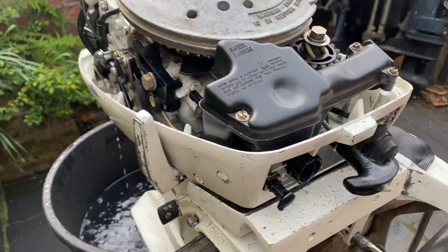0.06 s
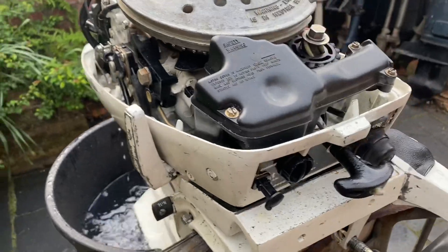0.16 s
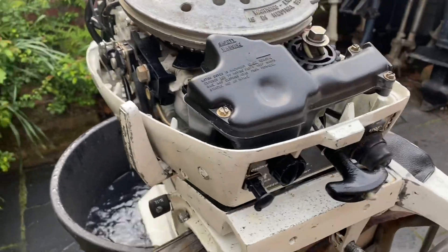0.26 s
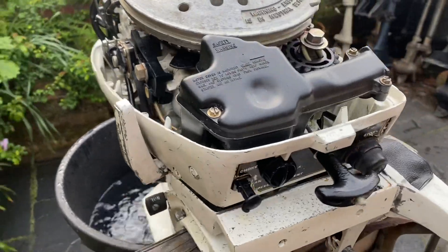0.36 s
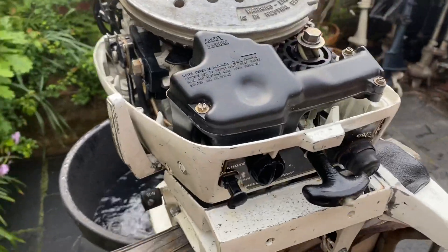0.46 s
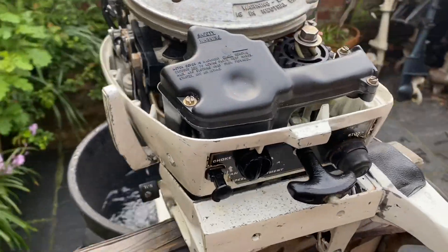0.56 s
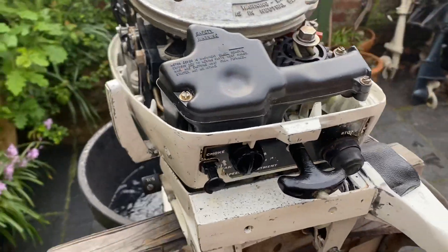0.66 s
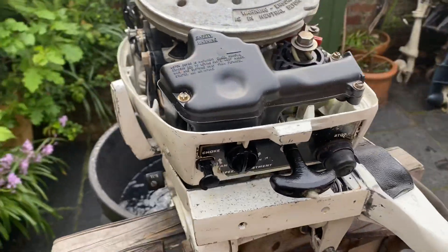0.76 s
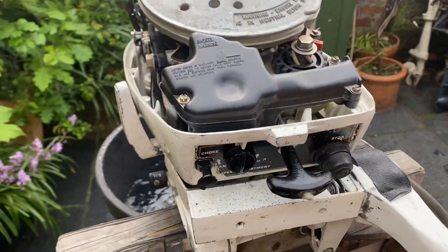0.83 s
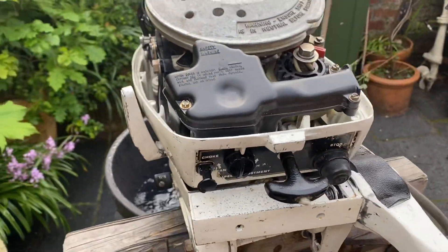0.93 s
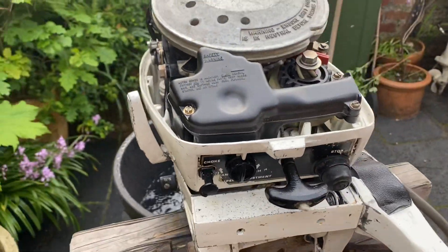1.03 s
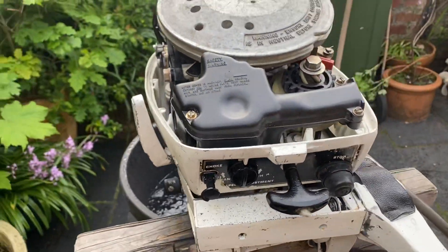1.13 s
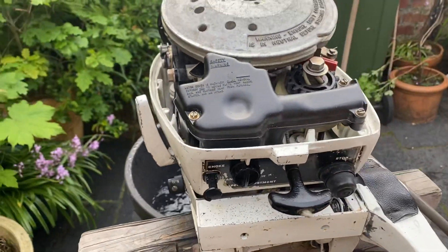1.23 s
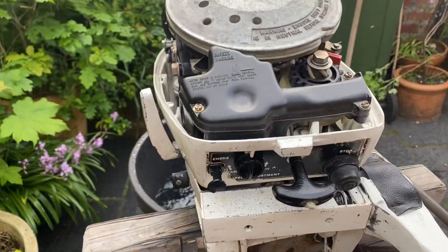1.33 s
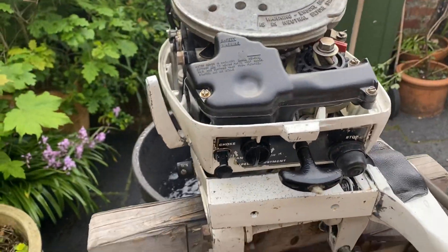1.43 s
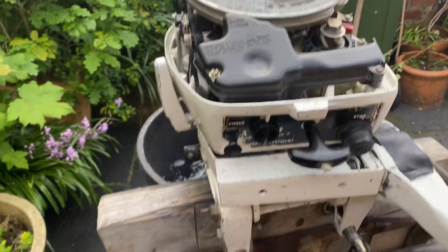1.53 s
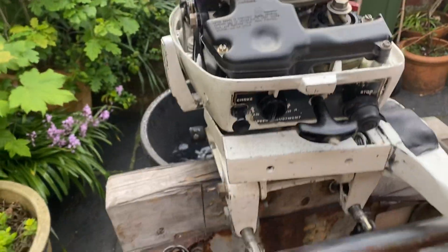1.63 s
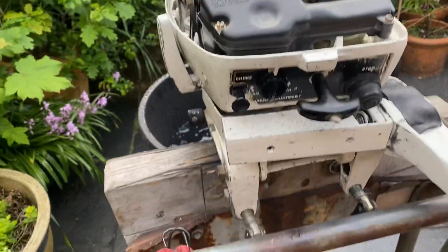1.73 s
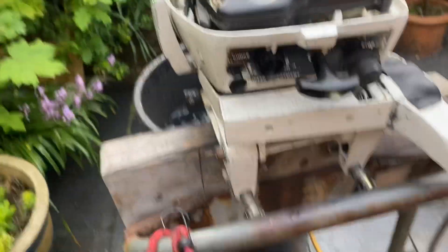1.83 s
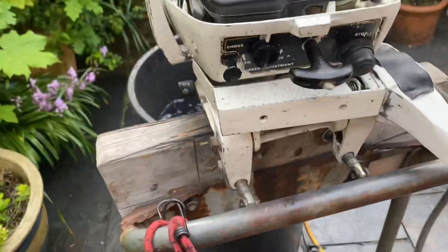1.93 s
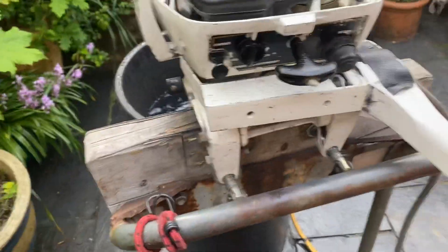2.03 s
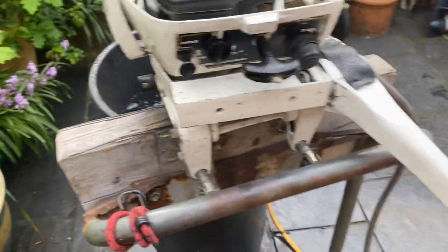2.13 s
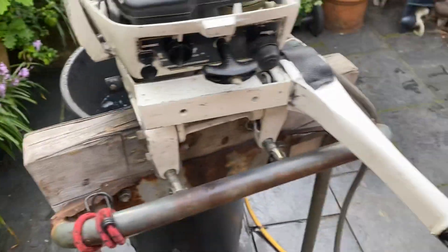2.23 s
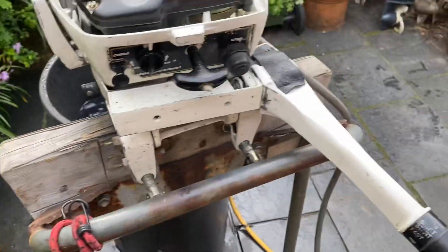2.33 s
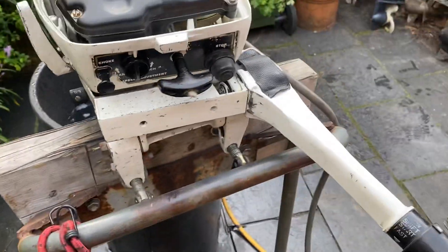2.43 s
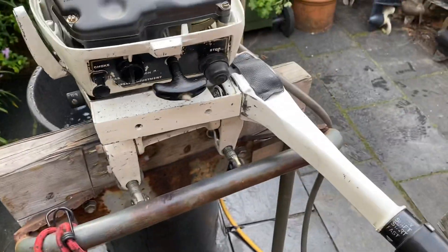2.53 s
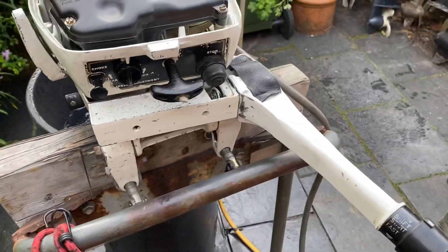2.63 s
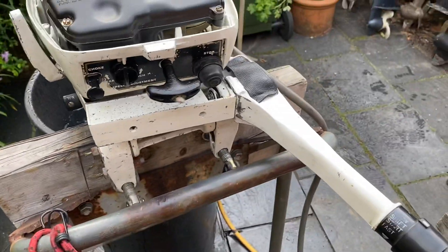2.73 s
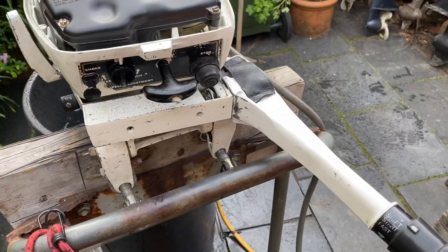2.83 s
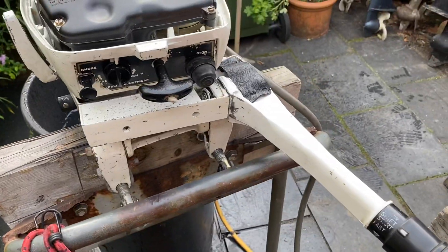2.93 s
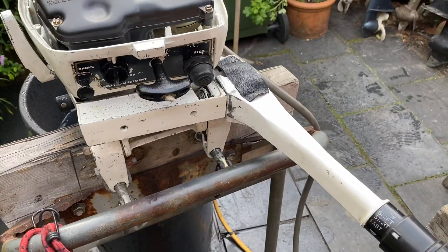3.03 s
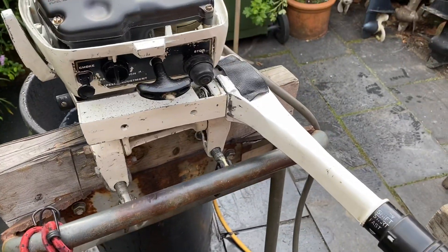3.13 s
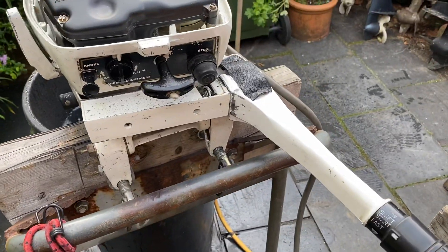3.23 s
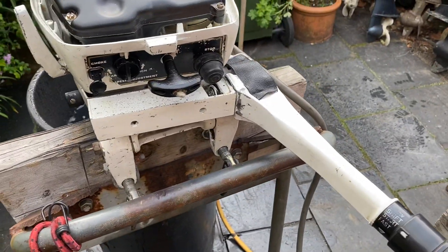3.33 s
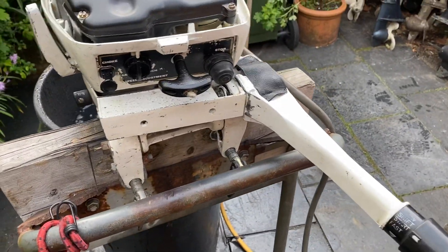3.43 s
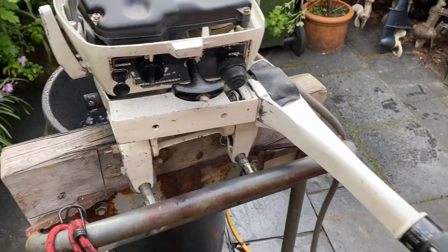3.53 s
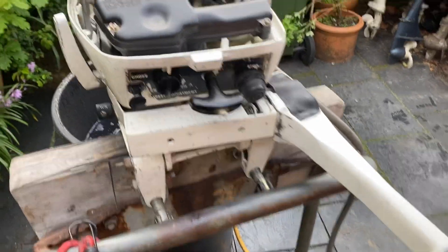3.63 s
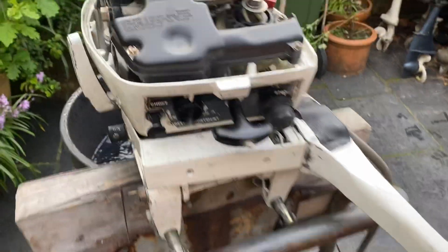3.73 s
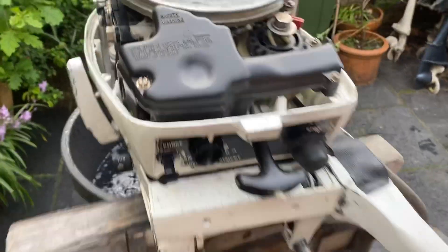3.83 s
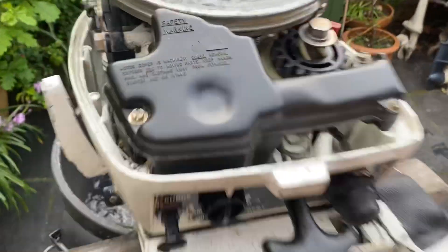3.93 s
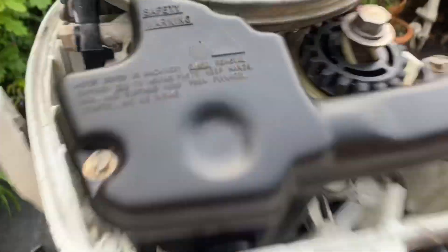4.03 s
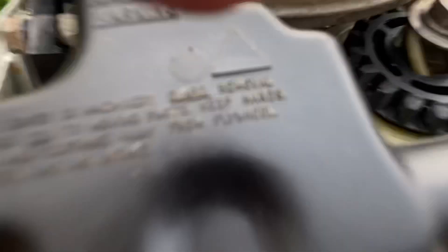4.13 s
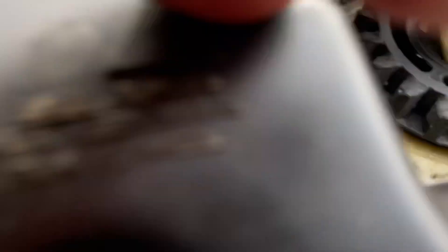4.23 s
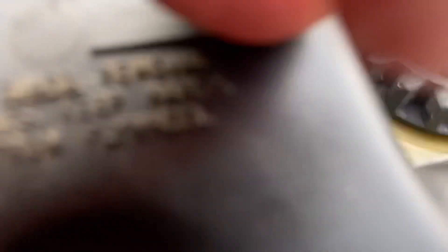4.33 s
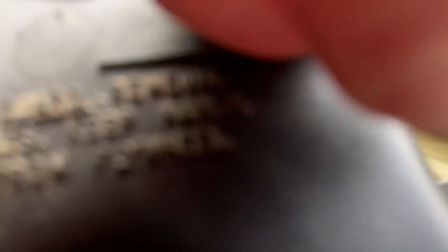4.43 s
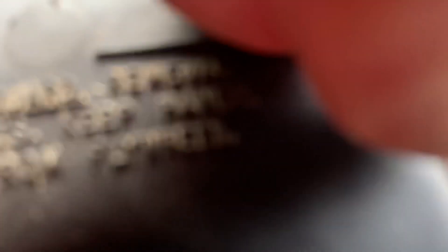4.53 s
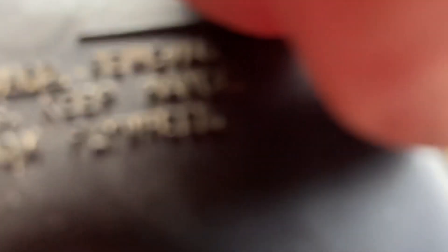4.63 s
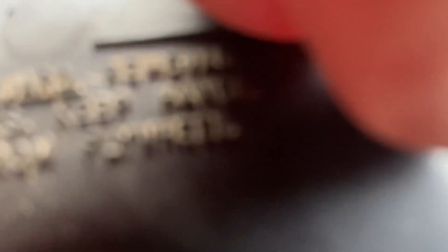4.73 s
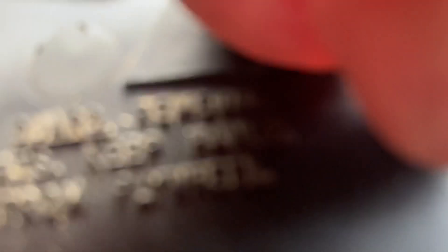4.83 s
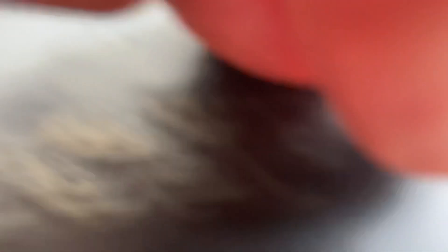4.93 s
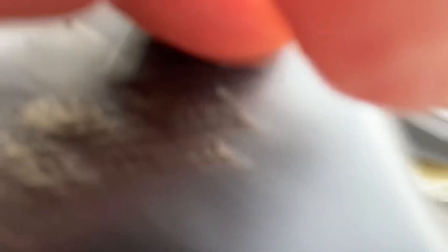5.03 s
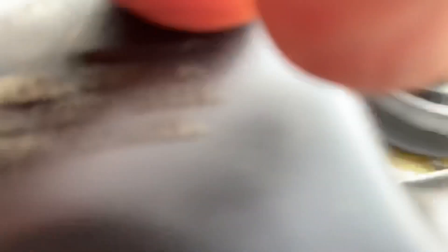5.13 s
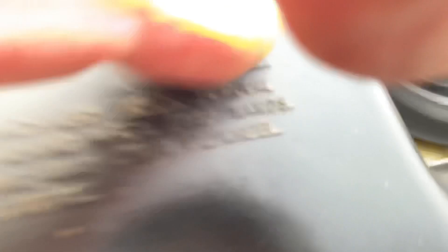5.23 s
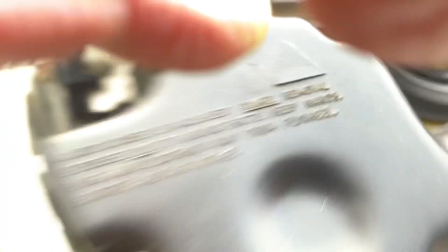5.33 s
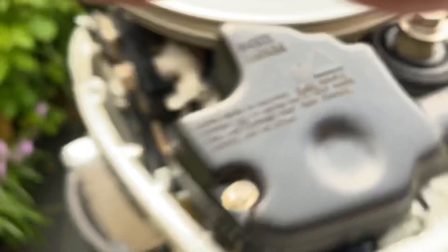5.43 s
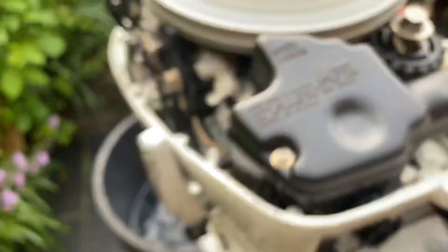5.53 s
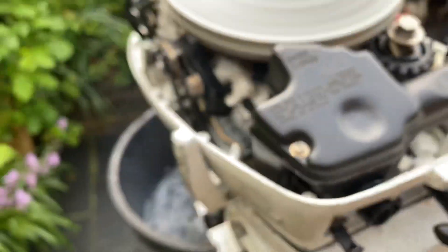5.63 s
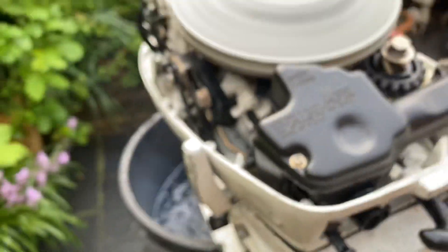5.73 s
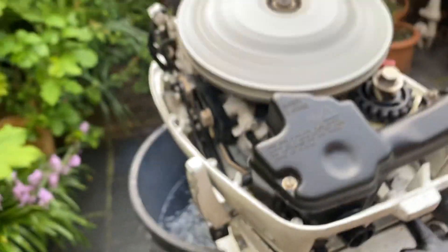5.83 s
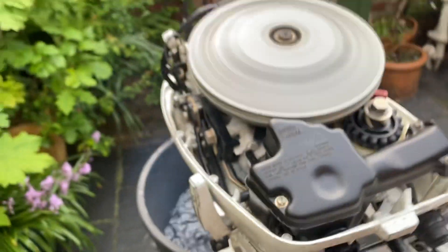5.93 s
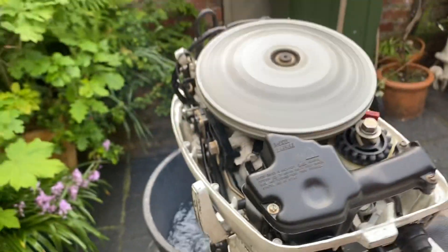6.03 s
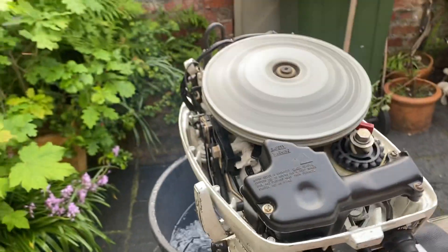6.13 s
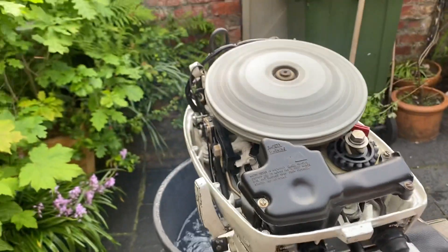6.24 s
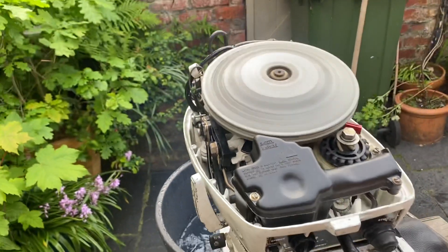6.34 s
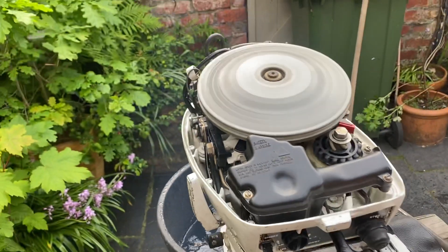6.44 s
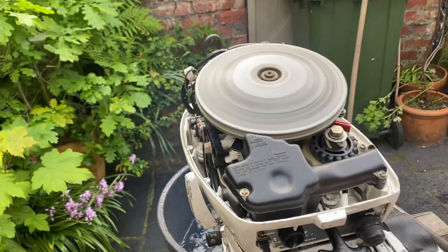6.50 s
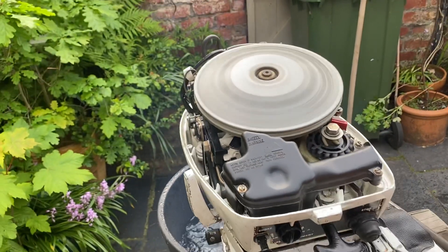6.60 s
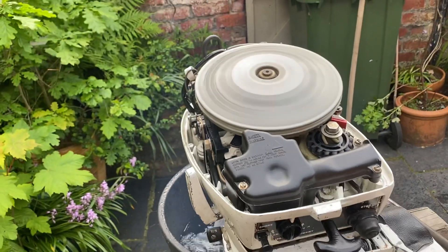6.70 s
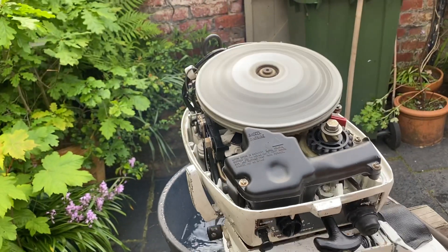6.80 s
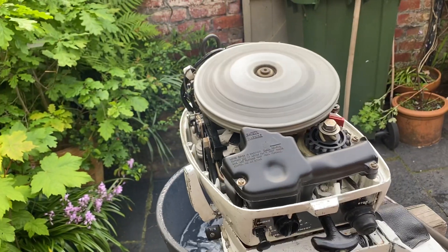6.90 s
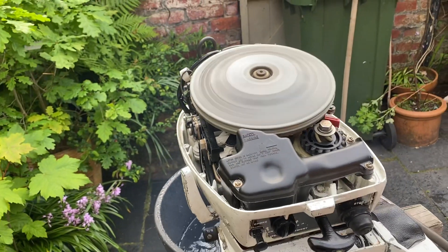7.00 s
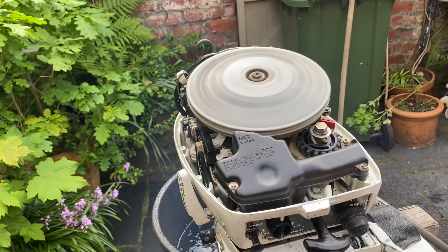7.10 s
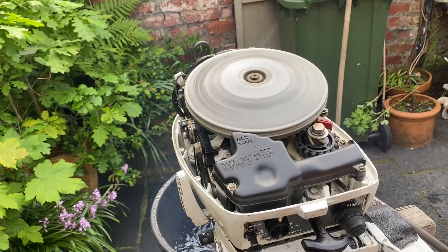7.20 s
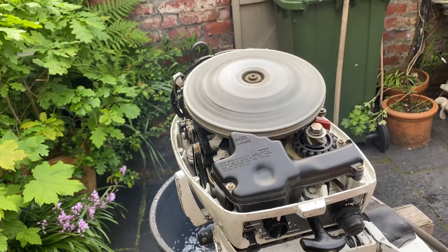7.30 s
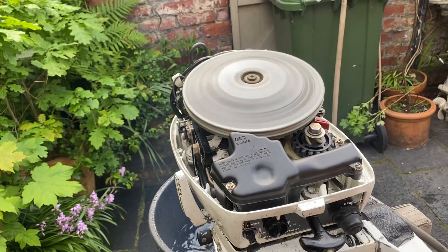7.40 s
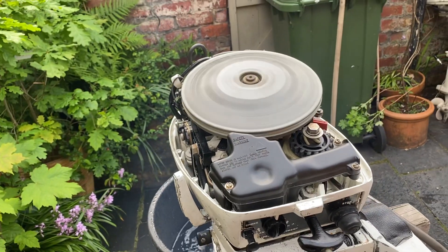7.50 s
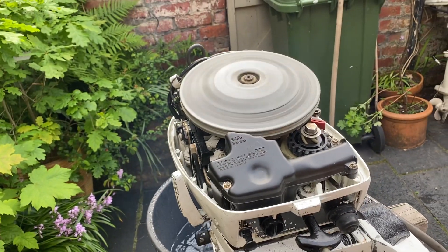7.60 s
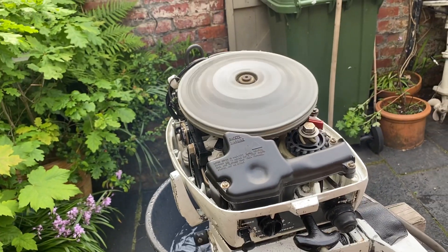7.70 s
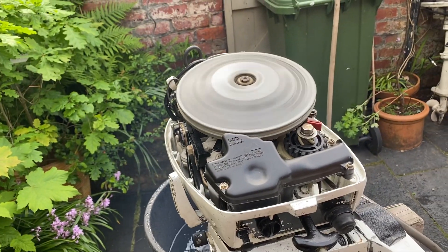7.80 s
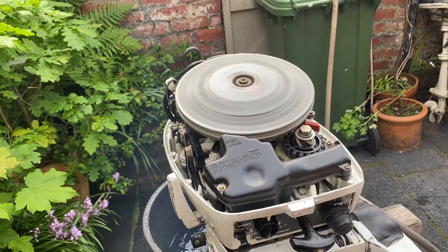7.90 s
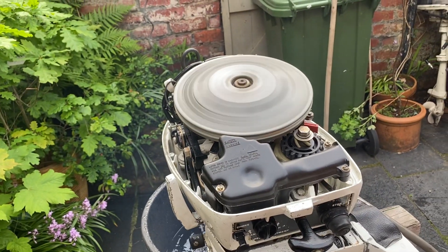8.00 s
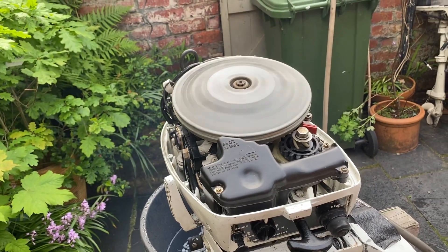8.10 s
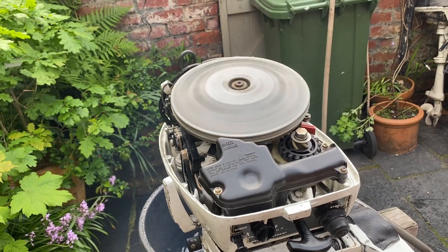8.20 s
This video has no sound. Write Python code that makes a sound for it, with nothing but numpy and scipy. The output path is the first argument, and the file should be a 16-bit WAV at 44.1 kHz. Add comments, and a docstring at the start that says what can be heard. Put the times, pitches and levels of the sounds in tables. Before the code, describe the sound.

A hose trickles into a bin of water in a small walled yard, over faint splashing hiss and hum. Soft drips, knocks and hand bumps come close to the phone. Fingers tap a plastic cover, a starter grinds in a short harsh burst, and a small two-stroke outboard catches, revs up fast, then drops toward a lumpy, slower run.

```python
"""Two-stroke outboard in a bin of water.

A small twin in a walled yard, heard by a phone: hand bumps and drips, fingers tap the cover, the starter
grinds, the engine catches, races and slows. Firing pulses ring the drowned exhaust leg and the air box;
throbbing noise makes clatter and hiss. A hose trickles in as gliding bubble tones over a noisy yard."""
import sys
import numpy as np
from scipy import signal
from scipy.fft import rfft, irfft, next_fast_len
from scipy.io import wavfile
from scipy.ndimage import uniform_filter1d

SR = 44100
rng = np.random.default_rng(int(sys.argv[2]) if len(sys.argv) > 2 else 0)


def bounce(signal):
    """Save signal as a 16-bit WAV file at the path given by the first command-line argument."""
    frames = np.transpose(np.atleast_2d(signal))
    limited = np.clip(frames, -1, 1)
    pcm = np.round(limited * 32767).astype(np.int16)
    wavfile.write(sys.argv[1], SR, pcm)


N = 364266


def undb(db):
    """Amplitude factor for a level in dB."""
    return 10 ** (np.asarray(db) / 20)


def level(x, db):
    """Scale to an rms in dB."""
    return x * undb(db) / np.sqrt(np.mean(x ** 2))


def ramp(start, length):
    """0 before start, 1 after start + length, in seconds."""
    return np.clip((np.arange(N) / SR - start) / length, 0, 1)


def curves(table):
    """Columns on every sample, and a gate that is open while the table lasts."""
    s, *columns = np.transpose(table)
    t = np.arange(N) / SR
    gate = np.clip(np.minimum(t - s[0], s[-1] + 0.032 - t) / 0.022, 0, 1)
    return [np.interp(t, s, c) for c in columns] + [gate]


def pan(x, db):
    """Two channels, the left louder than the right by db."""
    return x * undb(np.array([db / 2, -db / 2]).reshape(2, -1))


def peak(x, hz, q):
    """One resonance."""
    return signal.lfilter(*signal.iirpeak(hz, q, SR), x)


def band(x, order, edges_hz, kind="band"):
    """Butterworth filter."""
    return signal.sosfilt(signal.butter(order, edges_hz, kind, fs=SR, output="sos"), x)


def modes(x, table):
    """Resonances side by side, alternating in sign; rms 1."""
    out = 0
    for k, (hz, width_hz, db) in enumerate(table):
        out = out + (-1) ** k * undb(db) * peak(x, hz, hz / width_hz)
    return level(out, 0)


def colour(x, table):
    """Shape a noise to (Hz, dB) points; rms 1."""
    hz, db = np.transpose(table)
    size = next_fast_len(N)
    bins_hz = np.arange(size // 2 + 1) * SR / size
    gain = undb(np.interp(np.log(bins_hz + 1), np.log(hz), db))
    return level(irfft(rfft(x, size) * gain, size)[..., :N], 0)


def walk(rate):
    """Random levels held 1 / rate s and slewed; spread near 1."""
    k = int(SR / rate)
    steps = np.repeat(rng.standard_normal(N // k + 1), k)
    return 1.3 * uniform_filter1d(uniform_filter1d(steps, k), k)[:N]


def pair(alike):
    """Left and right noise with the given likeness."""
    mid, side = rng.standard_normal((2, N))
    return np.sqrt((1 + alike) / 2) * mid + np.sqrt((1 - alike) / 2) * side * np.array([[1], [-1]])


def airy(alike):
    """Broad noise that is nearly the same left and right above 7 kHz."""
    return band(pair(alike), 4, 7000, "low") + band(pair(.96), 4, 7000, "high")


# Engine speed. Each row: time in seconds, firing rate in Hz.
SPEED = [(4.958, 31), (5.03, 37), (5.08, 45.5), (5.12, 48.45), (5.2, 55.75), (5.3, 59.2), (5.45, 66.79),
         (5.6, 70.51), (5.8, 77.25), (6.0, 81.95), (6.15, 84.4), (6.3, 85.0), (6.5, 78.2), (6.9, 66.7),
         (7.1, 60.02), (7.3, 55.5), (7.7, 48.15), (7.9, 45.28), (8.26, 41.13)]
# Exhaust course. Each row: time in seconds, low leg ring in dB, high leg ring in dB, bare thump in dB.
EXHAUST = [(4.98, -33, -43, -28.5), (5.14, -29.5, -28, -22.5), (5.45, -23, -25.5, -31.5),
           (5.66, -39, -24.5, -40), (5.85, -22.5, -19, -29.5), (6.1, -20, -17.5, -32),
           (6.3, -18.5, -16.5, -41), (6.42, -27.5, -26.5, -33), (6.6, -46, -23.5, -31),
           (6.85, -30.5, -21, -36), (6.97, -25.5, -19.5, -42), (7.05, -20, -22, -38),
           (7.4, -26.5, -26, -22.5), (7.88, -21, -41, -22), (7.92, -27.5, -22, -24),
           (8.26, -23, -37, -17.5)]
# Layer levels before the mix. Each entry: coasting dB, dB added under load,
# dB per octave of speed under load, dB added with the phone close.
LAYERS = dict(box=(-46, 15.5, 13, 4), intake=(-40, 10, 9, 1), clatter=(-41.5, 6.5, 2.5, -1),
          hiss=(-49, 4.5, 9.5, 8), shake=(-62, 28.5, 29.5, -4))
REFERENCE_HZ = 92.8  # firing rate from which speed octaves count
THROTTLE_SHUT_S, SHUT_LAG_TURNS, COAST_S, LURCH_S = 6.35, .22, 0.44, 0.22  # load and jolt decay after the shut
PULLED_BACK_S, PULL_S = 5.53, 0.034  # the phone leaves the cover
TURNED_S, TURN_S, CLOSE_PAN_DB, FAR_PAN_DB = 5.2, 0.37, 16.5, 3.5  # it first swings to face the engine


def engine():
    """Speed, load and phone distance drive the leg, air box, intake, clatter, hiss and shaking stand."""
    t = np.arange(N) / SR
    hz = curves(SPEED)[0]
    low_db, high_db, thump_db, gate = curves(EXHAUST)
    running = np.sqrt(np.mean(gate))  # offsets the silent span in the rms scaling
    shut = ramp(THROTTLE_SHUT_S, .03)
    since = np.maximum(t - THROTTLE_SHUT_S, 0)
    load = np.exp(-since / COAST_S)
    lurch = shut * np.exp(-since / LURCH_S)
    octaves = np.log2(hz / REFERENCE_HZ)
    close = 1 - ramp(PULLED_BACK_S, PULL_S)
    pan_db = CLOSE_PAN_DB + (FAR_PAN_DB - CLOSE_PAN_DB) * ramp(TURNED_S - TURN_S / 2, TURN_S)
    gain = {}
    for name, (db, load_db, rev_db, close_db) in LAYERS.items():
        gain[name] = undb(db + load * (load_db + rev_db * octaves) + close * close_db)

    # one turn per firing; the thump peaks just after the port opens
    turns = np.cumsum(hz * (t > SPEED[0][0])) / SR + 0.036 + hz * 0.00388 - SHUT_LAG_TURNS * shut
    pulses, miss_db = firings(t, turns, hz, octaves, lurch)
    leg = running * exhaust_leg(pulses, miss_db, low_db, high_db, thump_db)
    box = running * air_box(t, pulses) * gain["box"]
    air = 0.87 * intake(turns, hz, load, running) * gain["intake"]
    throb = knocking(turns)
    near = box + air + clatter(throb) * gain["clatter"]
    shake = stand(turns, octaves, shut, lurch, gain["shake"])
    return gate * (leg + pan(np.sqrt(2) * shake, -1.0) + pan(near, pan_db) + hiss(turns, throb) * gain["hiss"])


# Firings that fall weak or come hard. Each row: time in seconds, level change in dB.
MISFIRES = [(5.127, -5), (5.203, -15), (5.309, -13.5), (5.406, -5), (5.868, -12), (5.926, -13),
            (6.085, -3.5), (6.144, -12.5), (6.242, -8.5), (6.262, -5), (6.324, -5.5), (6.365, -6),
            (7.005, 2), (7.382, 1), (7.554, 0), (7.736, -3.5), (7.844, 2.5), (7.865, -6), (8.101, -17),
            (8.209, 3.5)]
MISFIRE_S = 0.0062
WEAK_DB, WEAK_LURCH_DB = -4.2, -3  # second cylinder: per squared octave, and just after the shut


def firings(t, turns, hz, octaves, lurch):
    """One blow-down pulse a firing, uneven in time and strength; the second cylinder is weaker."""
    count = turns.astype(int)
    at = np.flatnonzero(np.diff(count)) + 1
    strength, timing = rng.standard_normal((400, 2))[:len(at)].T
    coarse = t[::50]
    miss_db = sum(db * np.exp(-.5 * ((coarse - s) / MISFIRE_S) ** 2) for s, db in MISFIRES)
    miss_db = np.interp(t, coarse, miss_db)
    weak_db = WEAK_DB * octaves ** 2 + WEAK_LURCH_DB * np.sqrt(lurch)
    scatter_db = 50 / hz[at]  # slow running fires less evenly
    late = ((.005 - .010 * octaves[at]) * SR / hz[at] * timing).astype(int)
    pulse_db = miss_db[at] + weak_db[at] * (count[at] % 2) + scatter_db * strength
    pulses = np.zeros(N)
    pulses[np.minimum(at + late, N - 1)] = undb(pulse_db) / np.sqrt(hz[at])
    return pulses, miss_db


# Exhaust leg resonances. Each row: centre in Hz, width in Hz, level in dB.
LEG_LOW = [(248.8, 38, 2.5), (165, 390, -14)]
# Upper exhaust leg resonance. Each row: centre in Hz, width in Hz, level in dB.
LEG_HIGH = [(323.3, 79, 0)]
CHOKE_START_S, CHOKE_END_S, CHOKE_DB = 8.098, 8.114, -16  # the leg's rings dip after a missed stroke
THUMP_HZ, THUMP_S, THUMP_LATE_S = 262, .0028, .0028


def exhaust_leg(pulses, miss_db, low_db, high_db, thump_db):
    """Pulses and gas churning in the water ring the leg, over a bare thump of a few swelling cycles."""
    firing = signal.sosfilt(signal.cheby2(2, 24, [125, 385], "band", fs=SR, output="sos"), pulses)
    firing = peak(firing, 270, 1.6)  # water softens the front of each thump
    gas = modes(rng.standard_normal(N), [(260, 200, 0)])
    churn = level(firing, 0) + undb(-15) * gas
    low = pan(modes(churn, LEG_LOW) * undb(low_db), -2.0)
    high = pan(modes(modes(churn, LEG_HIGH), LEG_HIGH) * undb(high_db), -3.0)
    choke = undb(CHOKE_DB * (ramp(CHOKE_START_S, .003) - ramp(CHOKE_END_S, .006)))
    rings = (low + high) * undb(0.27 * miss_db) * choke
    half = int(.01 * SR)
    span = np.arange(-half, half + 1) / SR - THUMP_LATE_S
    swell = np.cos(2 * np.pi * THUMP_HZ * span) * np.exp(-.5 * (span / THUMP_S) ** 2)
    thump = signal.oaconvolve(pulses, swell, "same")
    return rings + pan(level(thump, 0) * undb(thump_db), -1.5)


# Air box resonance. Each row: centre in Hz, width in Hz, level in dB.
AIR_BOX = [(441.7, 35, 0)]
HOWL_S, HOWL_DB, HOWL_LENGTH_S = 5.41, 9.5, 0.096


def air_box(t, pulses):
    """Firing pulses ring the air box, which howls for a moment as the revs rise."""
    howl = undb(HOWL_DB * np.exp(-.5 * ((t - HOWL_S) / HOWL_LENGTH_S) ** 2))
    return modes(peak(pulses, 450, 3.0), AIR_BOX) * howl


# Intake resonances. Each row: centre in Hz, width in Hz, level in dB.
INTAKE = [(526, 54, 1), (670, 47, 1.5), (744, 100, -2.5), (885, 190, -8)]


def intake(turns, hz, load, running):
    """Evenly opening reeds click, and each stroke draws a gulp of air noise."""
    reeds = np.diff(turns.astype(int), prepend=0) / np.sqrt(hz)
    reeds = band(reeds, 2, 500, "high")
    gulp = .4 + np.exp(-(turns % 1) / .3)
    air = np.array([modes(n * gulp, INTAKE) for n in pair(.5)])
    return running * (.5 + .15 * load) * modes(reeds, INTAKE) + 1.05 * air


def knocking(turns):
    """Envelope of three knocks a revolution (two firings), the first on average the hardest."""
    thirds = 1.5 * turns + .3
    knock = undb(4 * rng.standard_normal(600) + np.resize([3, -3, -2], 600))[thirds.astype(int)]
    return 1 + 1.1 * np.exp(-(thirds % 1) / .3) * knock


# Block and cover resonances. Each row: centre in Hz, width in Hz, level in dB.
CLATTER = [(1200, 460, -9.5), (1613, 290, -3.5), (2100, 760, -8), (2566, 730, -7), (3082, 81, -9.5),
           (4016, 216, -24.5)]


def clatter(throb):
    """Noise knocked in time with the crank rings the block and cover."""
    return np.array([modes(n * throb, CLATTER) for n in pair(.6)])


# Hiss spectrum. Each row: frequency in Hz, relative density in dB per Hz.
HISS = [(2500, -32), (3300, -7), (4000, 1.5), (6000, -10.5), (7250, 0.5), (8000, -12), (10600, -8),
        (13000, -11), (16000, -12.5)]


def hiss(turns, throb):
    """Broad noise that throbs with the knocks and swells once a firing."""
    return colour(airy(.2) * (throb + np.cos(np.pi * turns) ** 2), HISS)


LURCH_DB, WOBBLE_DB = -29.5, -54.5  # at twice the firing rate: jolt at the shut, steady part
ROCK_DB, ROCK_FLUTTER_DB = 8.5, 3  # after the shut: rise per octave of slowing, unevenness
RUMBLE_DB = -44.5


def stand(turns, octaves, shut, lurch, loaded):
    """The stand rocks at once and twice the firing rate, and the bin rumbles."""
    rock_db = -ROCK_DB * octaves
    once = loaded * (1 - shut) + undb(LAYERS["shake"][0] + rock_db) * shut
    twice = undb(WOBBLE_DB + rock_db * shut) + undb(LURCH_DB) * lurch
    shake = once * np.sin(2 * np.pi * turns) + twice * np.sin(4 * np.pi * turns)
    shake = shake * undb(ROCK_FLUTTER_DB * shut * walk(14))
    bin_mode = [(145, 160, 0)]
    rumble = modes(modes(rng.standard_normal(N), bin_mode), bin_mode)
    return shake + undb(RUMBLE_DB + 2 * walk(25)) * rumble


# Starter heaves. Each row: full at seconds, held till seconds, grind in dB, treble in dB.
HEAVES = [(4.832, 4.863, -13.5, -30.5), (4.871, 4.906, -12.5, -24.5), (4.959, 4.963, -11.5, -21.5),
          (5.024, 5.035, -27.5, -32.5)]
# Pinion speed. Each row: time in seconds, teeth passing in Hz.
TEETH = [(4.8, 224.9), (4.875, 237.1), (4.9, 299.7), (4.93, 251.2), (4.97, 290.5)]
# Pinion and flywheel resonances. Each row: centre in Hz, width in Hz, level in dB.
GEAR = [(451, 62, 9), (860, 400, 4.5), (1200, 206, 10.5), (1520, 304, 5), (1880, 280, -18),
        (2880, 300, -21)]
# Scrape spectrum. Each row: frequency in Hz, relative density in dB per Hz.
SKATE = [(900, -11.5), (1500, -2), (2400, -9), (5800, -12.5), (8300, -9.5), (11200, -10.5), (13500, -13),
         (16300, -26)]
STARTER_ON_S, STARTER_OFF_S = 4.76, 5.12
HEAVE_RISE_DB_S, GRIND_FALL_DB_S, TREBLE_FALL_DB_S = 573, 314, 159
THUD_DB, THUD_SAG_DB, THUD_SAG_S = -19, -9.5, 0.076
TOOTH_CLICK_DB, TOOTH_TONE_DB = -4.5, -0.5


def starter():
    """The pinion grinds the flywheel teeth in heaves over the compressions, then skates free."""
    t = np.arange(N) / SR

    def heave(full, till, db, fall_db_s):
        rise = HEAVE_RISE_DB_S * np.maximum(full - t, 0)
        return undb(db - rise - fall_db_s * np.maximum(t - till, 0))

    effort = np.max([heave(a, b, db, GRIND_FALL_DB_S) for a, b, db, _ in HEAVES], axis=0)
    treble = np.max([heave(a, b, db, TREBLE_FALL_DB_S) for a, b, _, db in HEAVES], axis=0)
    bite = HEAVES[0][0]
    sag = 1 - np.exp(-np.maximum(t - bite, 0) / THUD_SAG_S)
    weight = heave(bite, bite, THUD_DB, 0) * undb(THUD_SAG_DB * sag)
    gate = ramp(STARTER_ON_S, 0.0067) - ramp(STARTER_OFF_S, 0.033)

    passed = np.cumsum(curves(TEETH)[0] * (1 + .05 * walk(150))) / SR  # teeth so far
    clicks = level(np.diff(passed.astype(int), prepend=0), TOOTH_CLICK_DB)
    rasp = rng.standard_normal(N) * (.25 + 1.8 * np.exp(-(passed % 1) / .22))
    teeth = (clicks + rasp) * undb(4 * walk(260))
    grind = modes(teeth, GEAR) * effort
    body = modes(rng.standard_normal(N), [(240, 62, 10.0), (105, 470, -1.5)])
    thud = (body + undb(TOOTH_TONE_DB) * np.sin(2 * np.pi * passed)) * weight
    scrape = colour(airy(.6) * undb(3.0 * walk(400)), SKATE)
    return gate * (pan(grind, 13.2) + thud + scrape * treble) + skating(scrape)


# Teeth skating over the flywheel. Each row: start in seconds, level in dB before SKATE_TRIM_DB,
# decay in seconds, ring in Hz.
SKATES = [(4.781, -24, 0.0073, 1300), (4.957, -7.5, 0.014, 2800), (4.974, 1.5, 0.0043, 5640),
          (4.992, -10, 0.0066, 1500), (5.025, -10, 0.0072, 1600), (5.052, -14.5, 0.013, 1690),
          (5.066, -4, 0.0067, 4700), (5.081, -5, 0.0024, 4520), (5.111, -22, 0.0068, 4600),
          (5.142, -13, 0.0061, 1570), (5.149, -12, 0.005, 5340), (5.189, -16, 0.0055, 4510),
          (5.199, -10.5, 0.013, 5000), (5.213, -10.5, 0.005, 4400), (5.253, -13, 0.0095, 3360),
          (5.2877, -20, 0.0049, 4300), (5.2991, -10, 0.01, 4900), (5.326, -19, 0.0078, 5200),
          (5.349, -18, .012, 4800), (5.403, -17, .005, 4600), (5.422, -21, 0.0088, 4730)]
SKATE_TRIM_DB, SKATE_RING_DB, SKATE_RING_Q, SKATE_RISE_S = -14, -3, 2.6, 0.00089


def skating(scrape):
    """Each skate is a short burst of scrape that sings in its own band."""
    out, u = np.zeros((2, N)), np.arange(int(.08 * SR)) / SR
    for s, db, decay, hz in SKATES:
        part = slice(int(s * SR), int(s * SR) + len(u))
        ring = level(peak(scrape[:, part], hz, SKATE_RING_Q), SKATE_RING_DB)
        shape = np.exp(-u / decay) * (1 - np.exp(-u / SKATE_RISE_S))
        out[:, part] += (scrape[:, part] + ring) * undb(db + SKATE_TRIM_DB) * shape
    return out


# Fingers on the cover. Each row: start in seconds, peak in dB, crack in dB, rattle length in seconds,
# brightness in dB an octave, left minus right in dB.
TAPS = [(4.338, -12, -32.5, 0.0059, 8, 7.5), (4.348, -13.5, -41, 0.012, -3.5, 14.5),
        (4.375, -14.5, -27.5, 0.0084, -1.5, 8.5), (4.413, -16, -31, 0.0068, -8, 11.5),
        (4.493, -22, -43, 0.0068, -4, 11), (4.505, -26, -36, 0.013, -3, 6),
        (5.514, -4.5, -20, 0.0097, 0, 2), (5.522, -22.5, -16, 0.028, 10, 14.5)]
# Cover resonances. Each row: centre in Hz, width in Hz, level in dB.
COVER = [(548, 64, 2.5), (1026, 130, 4.5), (1680, 440, -2), (2930, 350, -10), (4630, 400, -23.5)]


def taps():
    """Each tap is a short noise rattle into the cover modes, with a crack on top."""
    out, t = np.zeros((2, N)), np.arange(int(.1 * SR)) / SR
    noise = rng.standard_normal((len(TAPS), 2, len(t)))
    for (s, db, crack_db, length, tilt_db, pan_db), (rattle, crack) in zip(TAPS, noise):
        burst = np.exp(-(t / length) ** 2)
        tilted = [(hz, width, g + tilt_db * np.log2(hz / 1000)) for hz, width, g in COVER]
        body = modes(rattle * burst, tilted)
        crack = level(peak(crack, 6500, .8), crack_db) * np.exp(-t / 0.0045)
        tap = undb(db) * body / np.abs(body).max() + crack
        out[:, int(s * SR):int(s * SR) + len(t)] += pan(tap, pan_db)
    return out


# Drips and small knocks nearby. Each row: start in seconds, level in dB, ring in Hz, rise in seconds,
# click in dB against the ring, left minus right in dB.
KNOCKS = [(.075, -39, 570, .004, -15, -1), (.655, -44, 1770, .004, -15, -1),
          (1.457, -42, 581, 0.0046, -15, 0), (2.081, -41, 1514, 0.006, -21, 3),
          (2.579, -44, 746, 0.003, -15, 5), (3.56, -41, 631, 0.0054, -15, 6),
          (2.351, -42, 2730, .001, -8, 11), (2.412, -46, 2370, .004, -8, 10),
          (2.671, -44.5, 6330, 0.0025, 6, 10), (1.87, -47, 2470, .0005, 1, 2),
          (2.789, -48, 890, .001, 13, 8), (2.797, -40, 657, 0.0016, 8.5, 12),
          (3.018, -33.5, 2290, 0.0026, -12, 10), (3.1, -31, 316, 0.0096, -1.5, 5),
          (4.624, -29, 1108, 0.0055, -41, 9)]
KNOCK_T60_S, KNOCK_RISE_S = 0.063, 0.0027


def knocks():
    """A short ring in a grainy body, with a soft scrape at the start."""
    out, t = np.zeros((2, N)), np.arange(int(.15 * SR)) / SR
    noise = rng.standard_normal((len(KNOCKS), len(t)))
    for (s, db, hz, rise, click_db, pan_db), grain in zip(KNOCKS, noise):
        fade = np.exp(-np.log(1000) * t / KNOCK_T60_S) * (1 - np.exp(-t / rise)) ** 2
        body = level(peak(peak(grain, hz, 1.5), hz, 3), -4)
        ring = (0.79 * np.sin(2 * np.pi * hz * t) + body) * fade / fade.max()
        edge = level(band(grain, 3, [400, 4000]), click_db)
        edge = edge * np.exp(-t / 0.0051) * (1 - np.exp(-t / KNOCK_RISE_S))
        out[:, int(s * SR):int(s * SR) + len(t)] += pan(undb(db) * (ring + edge), pan_db)
    return out


# Dropping twangs. Each row: start in seconds, peak in dB before the decay, time already travelled
# in seconds, left minus right in dB.
TWANGS = [(1.668, -34, 0.0017, 8), (1.87, -34, 0.0007, 1)]
TWANG_TURNS, TWANG_S = 1.47, 0.033  # cycles while the elapsed time grows e-fold; decay


def twangs():
    """A jolt that spreads out on its way: the highs arrive first, the lows ever later."""
    out, t = np.zeros((2, N)), np.arange(int(.15 * SR)) / SR
    for s, db, lead, pan_db in TWANGS:
        sweep = -np.sin(2 * np.pi * TWANG_TURNS * np.log(1 + t / lead)) * np.exp(-t / TWANG_S)
        out[:, int(s * SR):int(s * SR) + len(t)] += pan(undb(db) * sweep, pan_db)
    return out


# Bumps of the hand on the phone. Each row: centre in seconds, level in dB, length in seconds, wobble in Hz.
BUMPS = [(1.525, -50, 0.018, 65), (1.58, -44, 0.011, 60), (1.631, -44, 0.02, 68), (1.715, -41, 0.016, 56),
         (1.774, -48, .012, 75), (1.893, -42.5, 0.023, 62), (4.156, -46, 0.03, 75), (4.265, -42, 0.014, 60),
         (4.378, -37.5, 0.042, 70), (4.456, -47, 0.047, 60), (4.666, -44, 0.24, 85)]
CASE_DB = 6.5  # case wobble over the rumble, in bumps under 30 ms


def handling():
    """Low lumpy rumble through the phone case, not quite alike left and right."""
    lumps, t = undb(2.0 * walk(24.93)), np.arange(N) / SR
    case = [(15, -37), (42, -0.5), (75, -7.0), (160, -8.0), (600, -20.0), (3000, -32.0), (9000, -77)]
    rumble = np.array([colour(n * lumps, case) for n in pair(0.53)])
    out = 0
    for s, db, length, hz in BUMPS:
        wobble = undb(CASE_DB) * np.cos(2 * np.pi * hz * (t - s)) * (length < .03)
        out = out + undb(db) * np.exp(-.5 * ((t - s) / length) ** 2) * (rumble - wobble)
    return out


# Recurring bubble sizes. Each row: ring in Hz, spread either way in Hz.
BIN = [(575, 59), (730, 57), (880, 72), (1100, 60), (1400, 93), (1790, 35), (1950, 43)]


def trickle(bubbles=1080, trickle_db=-50):
    """Bubbles from the hose: short tones gliding up, the low ones commonest; one size gurgles on for a while."""
    runs = rng.random(50)  # the size that recurs in each fiftieth of the time
    out, t = np.zeros((2, N + SR)), np.arange(int(0.054 * SR)) / SR
    for when, kind, off, size, place in rng.random((bubbles, 5)):
        if place < .22:
            kind = runs[int(when * len(runs))]
        hz, spread = BIN[int(len(BIN) * kind ** 1.5)]
        hz += spread * 2 * (off - .5)
        fade = np.exp(-t * (62 + hz / 20)) * (1 - np.exp(-t * 320))
        drop = np.sin(2 * np.pi * hz * t * (1 + 0.4 * t)) * fade
        at = int(when * N)
        out[:, at:at + len(t)] += pan(drop * undb(-1.8 * np.log(size + .02)), 12 * (place - .5))
    return level(out[:, :N], trickle_db)


# Yard spectrum. Each row: frequency in Hz, relative density in dB per Hz.
YARD = [(15, -47), (25, -12), (100, -7), (124, -12.5), (195, -12), (285, -10.5), (330, -7.5), (400, -11.5),
        (570, -9), (920, -11), (1830, -11), (5000, -18.5), (7500, -23), (11000, -24), (16300, -34.5)]
# Left-right likeness. Each row: frequency in Hz, likeness from 0 to 1.
YARD_ALIKE = [(60, .97), (250, .85), (600, .3), (5000, .2), (7500, .95), (16000, .97)]
# Mains hum. Each row: frequency in Hz, mean level in dB.
HUM = [(99, -57.5), (195, -63), (52.3, -67)]
# The phone turns, then a cupped hand closes round it. Each row: from seconds, to seconds,
# treble change in dB, middle change in dB, change of left minus right in dB.
MOVES = [(1.5, 2.0, -0.5, 0.5, 3), (4.08, 4.35, 1, 5, 2), (4.425, 4.608, -4, 1.5, -2.5)]
YARD_DB, OPEN_DB, OPEN_PAN_DB = -43.5, -1.5, 0  # OPEN: treble and middle, and pan, before the moves


def yard():
    """Splashing hiss and town murmur in half-octave bands that flicker alone, over mains hum."""
    out, t = 0, np.arange(N) / SR
    moved = sum(np.outer(change, ramp(a, b - a)) for a, b, *change in MOVES)
    shade_db, cup_db, pan_db = np.reshape([OPEN_DB, OPEN_DB, OPEN_PAN_DB], (3, 1)) + moved
    alike_hz, likeness = np.transpose(YARD_ALIKE)
    for hz in 30 * 2 ** np.arange(0, 9.2, .5):
        alike = np.clip(np.interp(np.log(hz), np.log(alike_hz), likeness), 0, 1)
        noise = band(pair(alike), 2, [hz / 2 ** 0.23, hz * 2 ** 0.25])
        flicker_db = 1.6 * walk(12) + 0.74 * walk(1.63)
        out = out + noise * undb(flicker_db + shade_db * (hz > 1800) + cup_db * (400 < hz < 1800))
    hum = sum(undb(db + 0.5 * walk(2.95)) * np.sqrt(2) * np.sin(2 * np.pi * hz * t) for hz, db in HUM)
    return pan(undb(YARD_DB) * colour(out, YARD) + hum, pan_db)


def scene():
    """Engine and starter, hand and water sounds, and the yard behind."""
    return engine() + starter() + taps() + knocks() + twangs() + handling() + trickle() + yard()


# Phase between left and right, stepping wider through the treble. Each row: frequency in Hz,
# left lead in radians.
PHASE_LEAD = [(0, 0), (300, .3), (900, .5), (3000, 0), (7400, 0), (8000, -2.9), (9000, -3.3), (9700, -6.2),
              (12000, -6.4), (12600, -9.3), (14300, -9.6), (14900, -12.5)]
TOP_HZ = 16200


def record(dry):
    """A phase table turns left against right, band by band; loud peaks are rounded and the top is cut."""
    size = next_fast_len(N)
    lead = np.interp(np.arange(size // 2 + 1) * SR / size, *np.transpose(PHASE_LEAD))
    turned = irfft(rfft(dry, size) * np.exp(.5j * np.outer([1, -1], lead)), size)[:, :N]
    rounded = np.tanh(1.05 * turned) / 1.05
    return signal.sosfilt(signal.ellip(8, .2, 70, TOP_HZ, fs=SR, output="sos"), rounded)


dry = scene()
out = record(dry)
bounce(out)
```